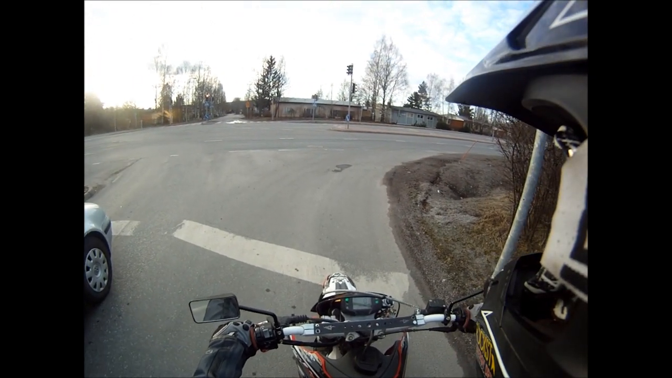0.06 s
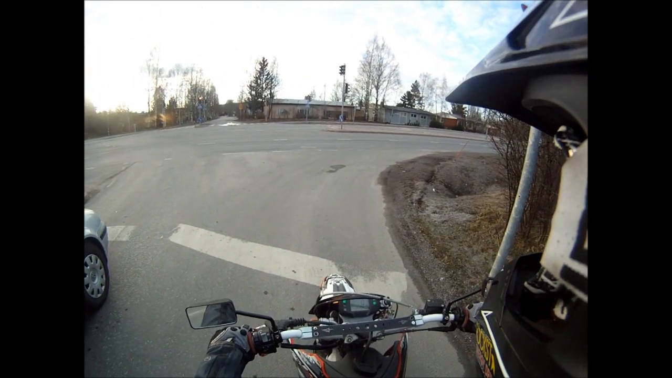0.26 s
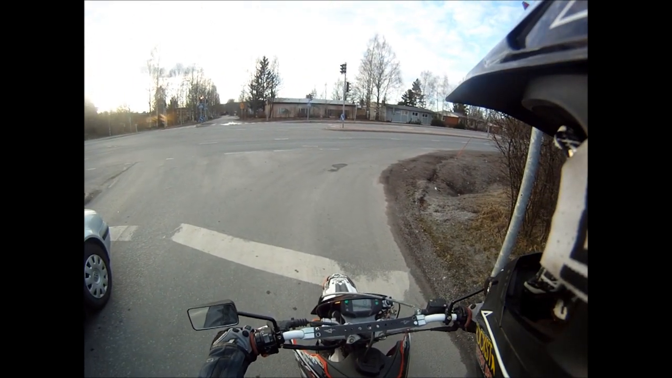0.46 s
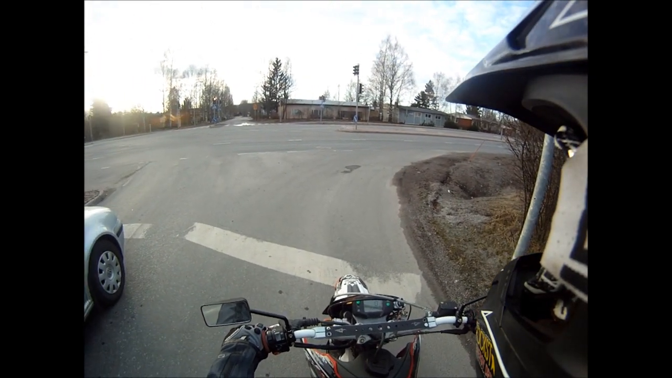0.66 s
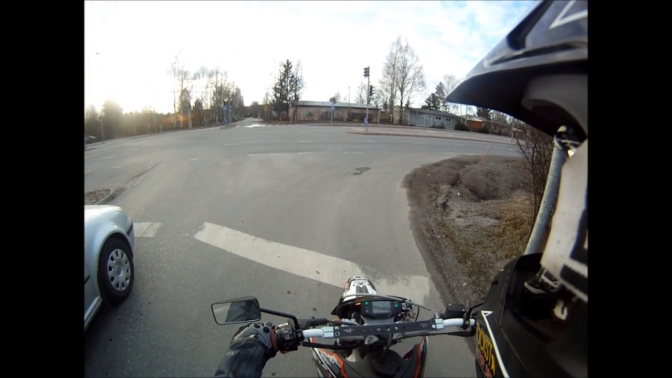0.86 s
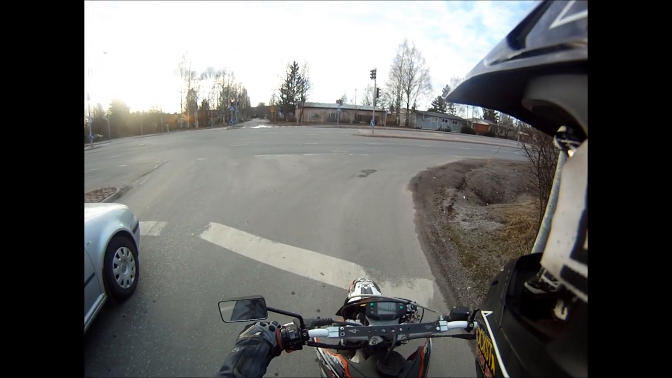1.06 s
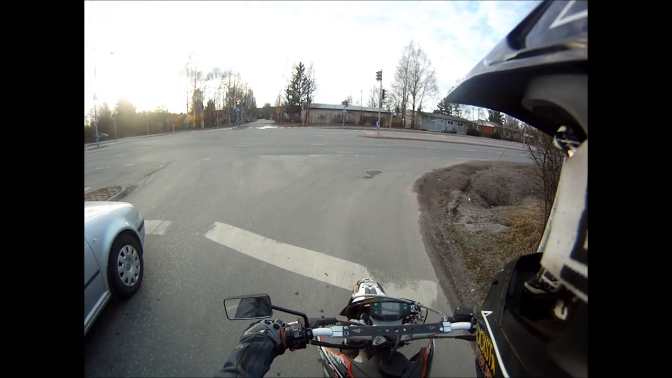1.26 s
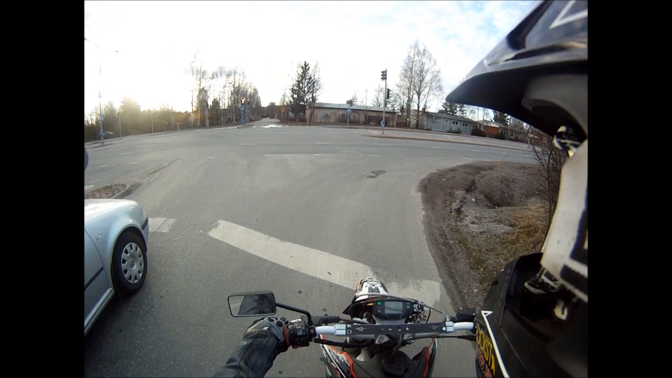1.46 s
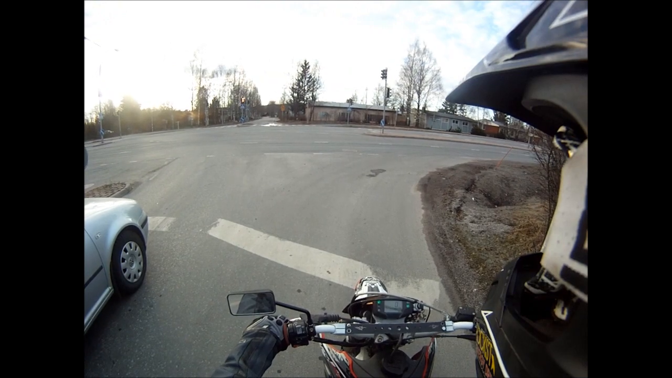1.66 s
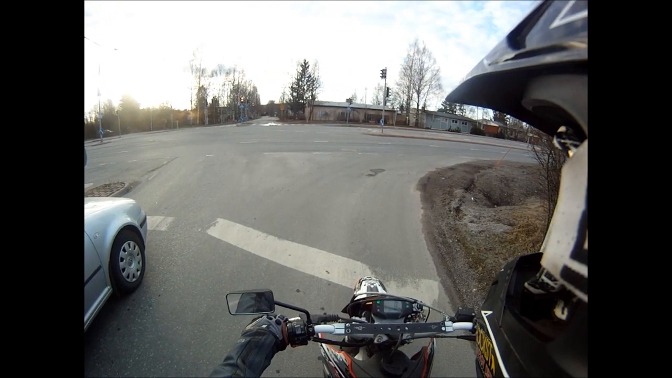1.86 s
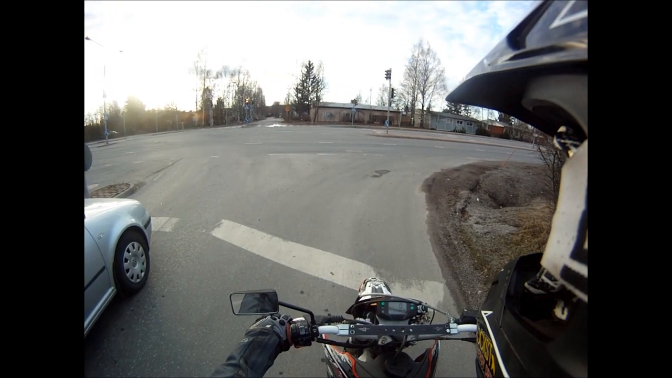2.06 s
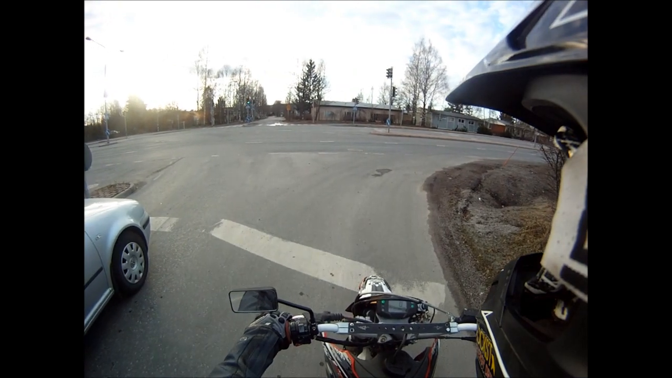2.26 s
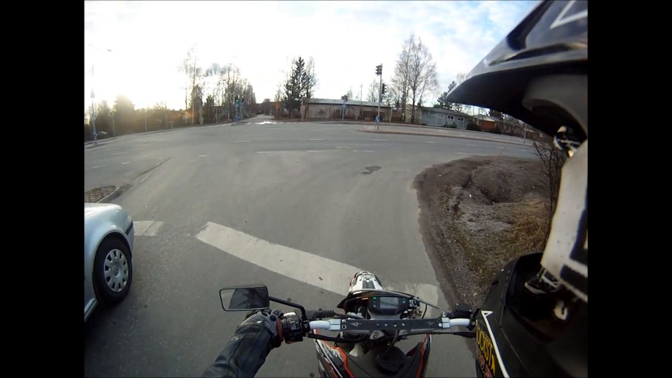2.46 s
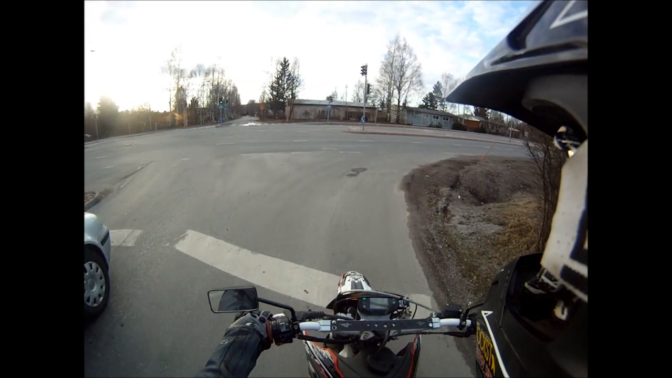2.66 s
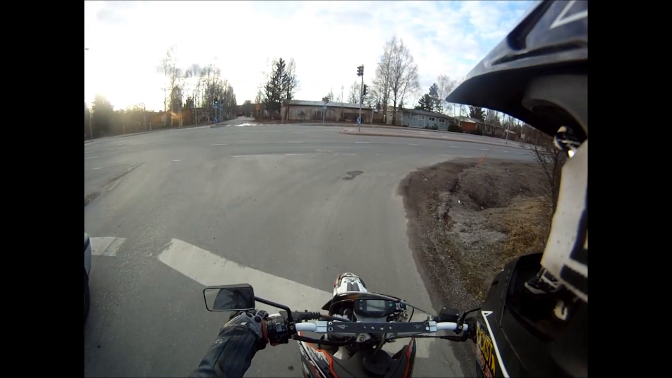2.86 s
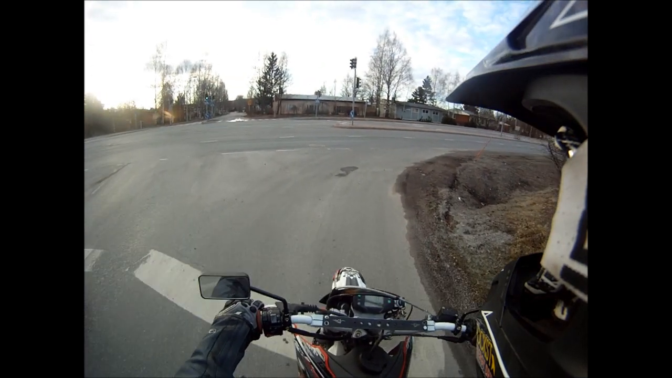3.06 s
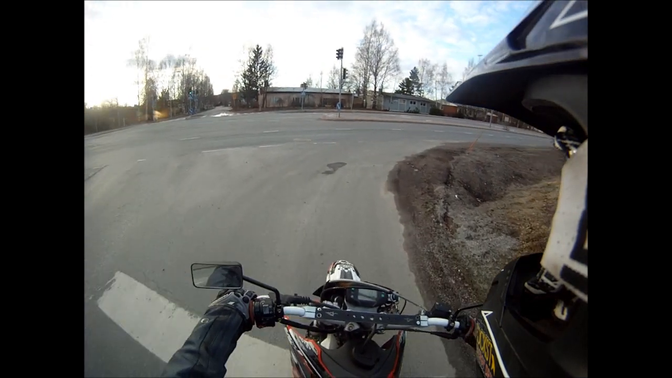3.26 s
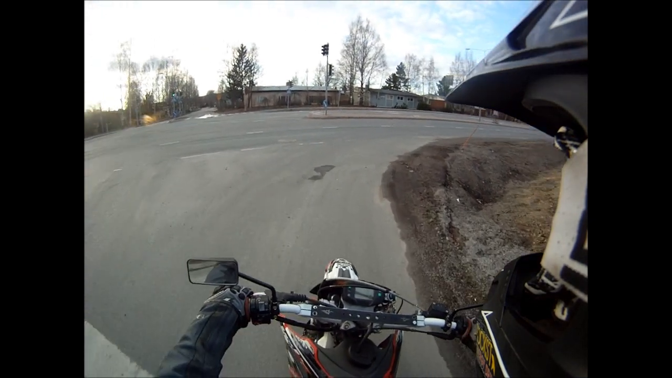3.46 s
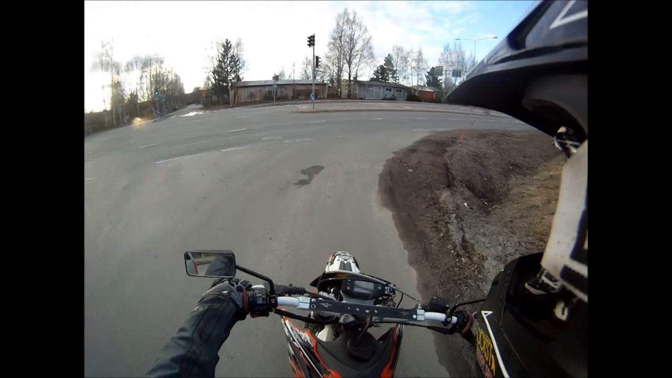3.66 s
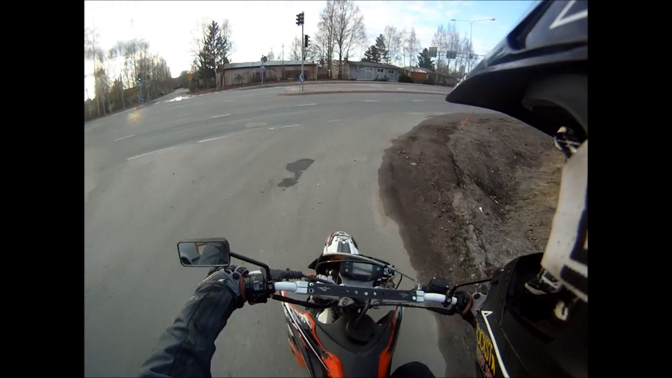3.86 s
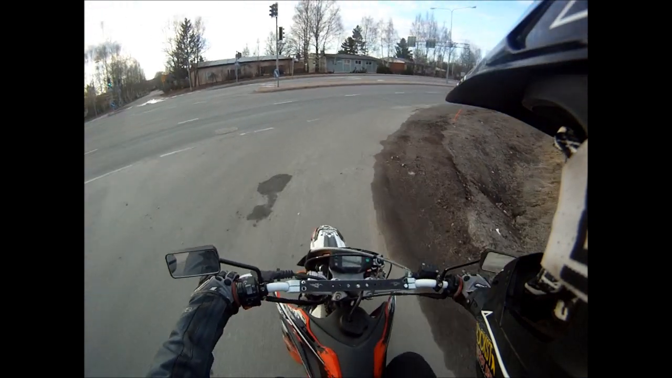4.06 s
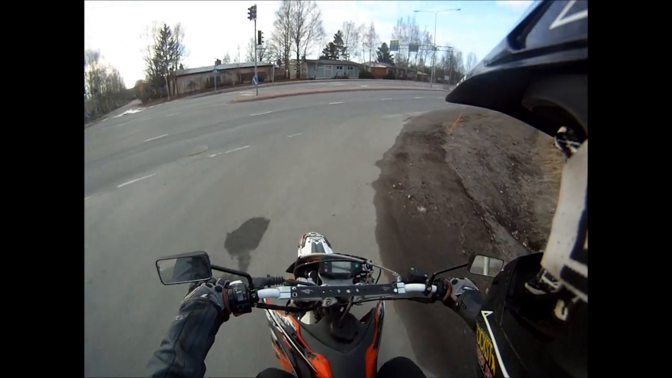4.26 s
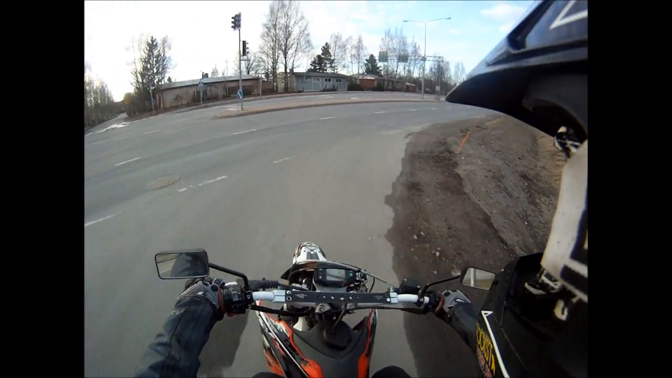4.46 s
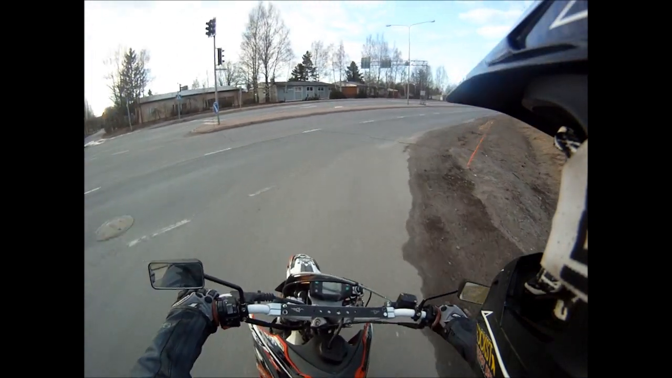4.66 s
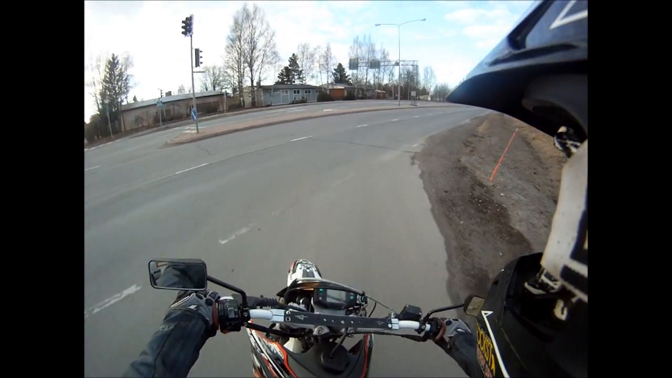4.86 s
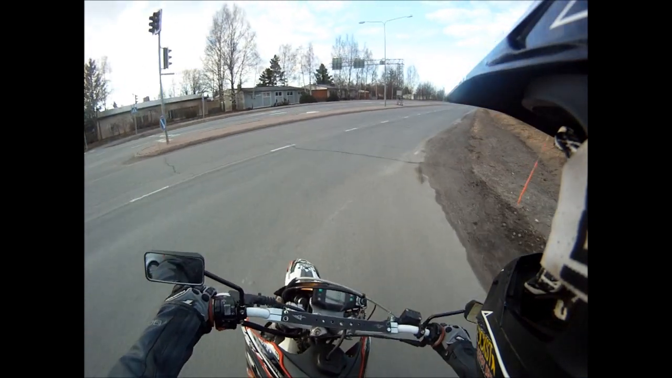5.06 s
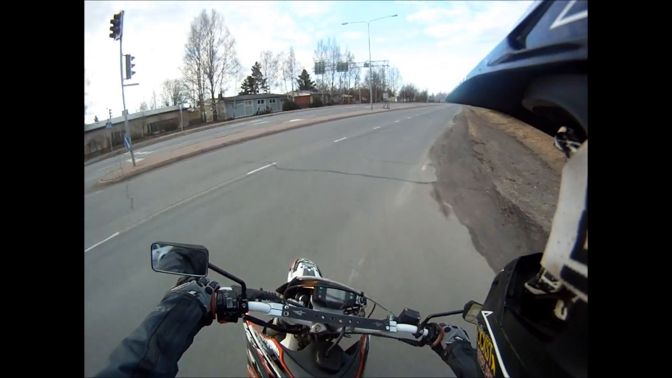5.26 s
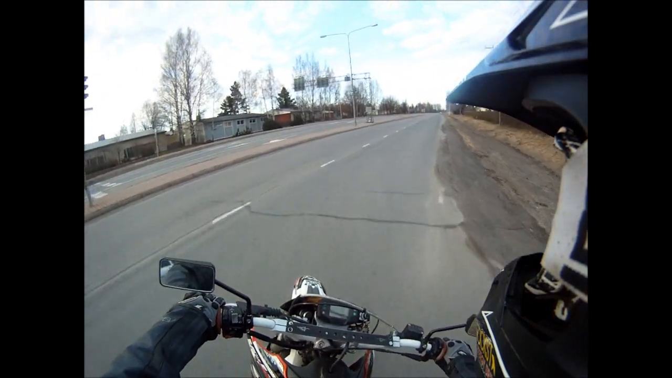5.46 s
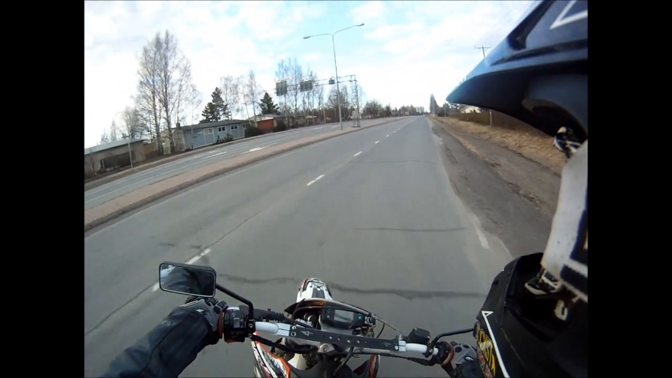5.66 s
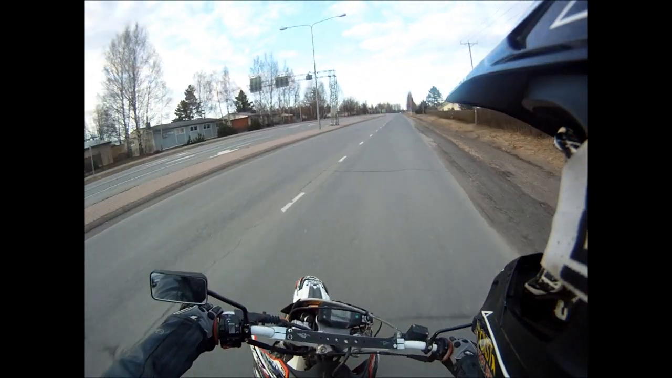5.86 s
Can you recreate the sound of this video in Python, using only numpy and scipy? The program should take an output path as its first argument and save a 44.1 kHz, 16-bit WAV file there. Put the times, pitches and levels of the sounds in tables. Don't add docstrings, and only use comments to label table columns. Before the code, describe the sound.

Close, gritty two-stroke dirt bike idles with uneven thumps and metal rattle, bites, pulls away, stutters briefly, then revs steadily higher.

```python
import sys
import numpy as np
from scipy import signal
from scipy.fft import rfft, irfft, next_fast_len
from scipy.io import wavfile
from scipy.ndimage import uniform_filter1d, map_coordinates

SR = 44100
rng = np.random.default_rng(int(sys.argv[2]) if len(sys.argv) > 2 else 0)


def volts_from_db(level):
    exponent = np.asarray(level, float) / 20
    return 10 ** exponent


def persist_wave(psi):
    counts = np.round(np.clip(psi, -1, 1) * 32767).astype(np.int16)
    wavfile.write(sys.argv[1], SR, np.atleast_2d(counts).T)


N = 261072
T = np.arange(N) / SR


def unit(x):
    return x / np.sqrt(np.mean(x ** 2) + 1e-20)


def steady(x, span):
    size = int(span * SR)
    power = uniform_filter1d(uniform_filter1d(x * x, size), size)
    return x / np.sqrt(np.abs(power) + 1e-12)


def curves(rows):
    s, *columns = np.transpose(rows)
    return [np.interp(T, s, column) for column in columns]


def wobble(rate):
    knots = rng.standard_normal(int(N * rate / SR) + 4)
    return map_coordinates(knots, [T * rate])


def passing(centre_s, width_s):
    return np.exp(-((T - centre_s) / width_s) ** 4)


def filtered(x, response):
    m = 2 * next_fast_len(N // 2 + SR // 4)
    return irfft(rfft(x, m) * response(np.fft.rfftfreq(m, 1 / SR)), m)[:N]


def modes(table):
    def response(f):
        total = 0
        for k, (centre, width, db) in enumerate(table):
            damping = 1j * f * width
            total = total + (-1) ** k * volts_from_db(db) * damping / (centre * centre - f * f + damping)
        return total
    return response


def spectrum_gain(spectrum, hz):
    f, db = np.transpose(spectrum)
    return volts_from_db(np.interp(np.log(hz + 1), np.log(f), db))


def coloured(spectrum, x):
    return unit(filtered(x, lambda hz: spectrum_gain(spectrum, hz)))


def causal(spectrum):
    def response(hz):
        cepstrum = irfft(np.log(spectrum_gain(spectrum, hz)))
        cepstrum[1:len(hz) - 1] *= 2
        cepstrum[len(hz):] = 0
        return np.exp(rfft(cepstrum))
    return response


# frequency in Hz, level in dB per Hz.
RUMBLE = [(12, -11), (25, -28), (50, 3), (100, -6), (200, -19.5), (400, -0.5), (800, -14.5), (2000, -59)]


def road():
    left_s, fade_db_per_s = 2.56, 25
    near = volts_from_db(-fade_db_per_s * np.clip(T - left_s, 0, None))
    idle_hz, hum_db, rumble_db = 28, -40, -38
    hum = np.sqrt(2) * near * volts_from_db(hum_db + 0.46 * wobble(3.9)) * np.sin(2 * np.pi * idle_hz * T)
    gust_s, gust_wide_s, gust_db = 4.87, 0.78, -34
    gust = volts_from_db(gust_db) * np.exp(-((T - gust_s) / gust_wide_s) ** 2)
    flutter = volts_from_db(4.6 * wobble(9.1))
    return hum + (volts_from_db(rumble_db) * near + gust) * flutter * coloured(RUMBLE, rng.standard_normal(N))


# start in seconds, peak in dB.
PINGS = [(1.7944, -20), (1.946, -17), (2.0423, -18.5), (2.1053, -15), (2.164, -14), (2.2243, -15),
         (2.2844, -19), (2.35, -24), (2.4095, -27), (2.475, -88), (2.5351, -38)]


def add_pings(metal):
    t = np.arange(600) / SR
    for s, db in PINGS:
        decay = volts_from_db(db + 29 - 60 * t / 0.015)
        metal[round(s * SR):][:len(t)] += decay * rng.standard_normal(len(t))


# frequency in Hz, level in dB per Hz.
RATTLE = [(380, -1.5), (650, -1), (747, -14), (858, -9), (950, -19), (1070, -6), (1220, -10), (1340, -3.5),
          (1780, -11.5), (2190, -4), (2810, -5), (3510, -19.5), (4110, -19.5), (4760, -18), (5950, -30),
          (7740, -77), (13100, -120)]
# centre in Hz, width in Hz, level in dB.
FINS_SLIP = [(1920, 100, -14.5), (2220, 19, 6), (2348, 34, -0.5), (2890, 44, 13), (3385, 42, 0.5),
             (3726, 77, 12.5), (4470, 64, 5), (4660, 82, 10)]
# centre in Hz, width in Hz, level in dB.
FINS_MOVING = [(1550, 13, 1.2), (2050, 42, 4.7), (2527, 18, 1.3), (2673, 22, 8.8), (3066, 12, 2),
               (3920, 19, 6.3), (4660, 24, 7.5), (5160, 52, 10)]


def rattle(size, phase, pulses, locked, slipping, throttle, pull_db):
    jolt = uniform_filter1d(size, size=600) * (1 + .4 * np.exp(-2.5 * phase))
    shake = steady(.3 + jolt, .2)
    loose = shake * volts_from_db(0.97 * wobble(8.3) + 0.77 * wobble(24.92)) * rng.standard_normal(N)
    knocks = filtered(pulses, lambda hz: 1 / (1 + (hz / 9000) ** 4))
    metal = np.sqrt(locked) * knocks + np.sqrt(1 - locked) * loose
    add_pings(metal)
    ring_slip = filtered(metal, modes(FINS_SLIP))
    ring_moving = filtered(metal, modes(FINS_MOVING))
    metal += slipping * ring_slip + (1 - slipping) * ring_moving
    idle_db, load_db, pull_share = -33.5, 2.5, 0.11
    level = volts_from_db(idle_db + (load_db + pull_share * pull_db) * throttle)
    return level * steady(coloured(RATTLE, metal), 0.55)


# level in dB, phase in turns.
WHINE = [(-29, 0.28), (-27.5, 0.29)]


def whine(angle):
    orders = [2, 8]
    tones = sum(volts_from_db(db) * np.sin(2 * np.pi * (order * angle + lag))
                for order, (db, lag) in zip(orders, WHINE))
    return passing(2.72, .17) * tones


def climb_howl(size, angle, climb):
    order, level_db, lag_turns = 5, -19, 0.28
    tone = np.sin(2 * np.pi * (order * angle + lag_turns))
    return uniform_filter1d(size, size=300) * climb * volts_from_db(level_db) * tone


# centre in Hz, width in Hz, level in dB.
RASP = [(1040, 15, 6.5), (1237.5, 39, 16.5), (1447, 130, -17), (1726, 56, 7.5), (2310, 210, -18),
        (2616, 630, -7)]
# centre in Hz, width in Hz, level in dB.
RASP_HOT = [(1110, 110, 8), (1330, 94, 12.5), (1730, 260, -9.5), (2420, 360, -5), (2730, 110, 2)]


def rasp(ring, hot, throttle, level_db, pull_db):
    idle_db, under_exhaust_db = -51, -25.5
    rasp_db = idle_db + throttle * (level_db + pull_db + under_exhaust_db - idle_db)
    cool_ring = unit(ring(modes(RASP), 2.5))
    hot_ring = unit(ring(modes(RASP_HOT), 3))
    return volts_from_db(rasp_db) * ((1 - hot) * cool_ring + hot * hot_ring)


# frequency in Hz, level in dB.
BARK_SLIP = [(220, -46.5), (375, 2.5), (455, 3), (510, -10), (546, 4.5), (580, -4), (620, -13), (661, -22),
             (701, -32), (840, -20.5), (960, -26), (1250, -56), (2110, -120)]
# frequency in Hz, level in dB.
BARK_WARM = [(220, -18.5), (370, -3), (405, 10.5), (430, 5), (480, 6), (515, -7), (545, 2), (585, -7),
             (625, 0.5), (665, -4.5), (740, -20.5), (850, -26), (960, -38), (6000, -140)]
# frequency in Hz, level in dB.
BARK_HOT = [(220, -55.5), (335, -42), (385, -16), (448, 2.5), (502, 1.5), (573, -6), (640, -1.5),
            (706, -26), (741, -20), (817, -40), (891, -23), (960, -46), (1250, -24), (2110, -120)]
BARK_DB = [-11.5, -13, -7.5]


def bark(ring, stages, level_db, bite_db):
    total = 0
    for stage, colour, db in zip(stages, [BARK_SLIP, BARK_WARM, BARK_HOT], BARK_DB):
        total = total + stage * volts_from_db(level_db + bite_db + db) * unit(ring(causal(colour), 1.7))
    return total


# frequency in Hz, level in dB.
BOOM_SLIP = [(20, -72), (40, -34), (65, -31.5), (130, -30.5), (195, -28.5), (228, -10), (258, -10),
             (295, -15), (330, -21), (390, -26), (6000, -120)]
# frequency in Hz, level in dB.
BOOM_WARM = [(20, -82), (40, -39.5), (85, -30), (125, -33), (158, -32.5), (175, -28), (210, -21),
             (238, -17), (258, -12.5), (285, -12), (325, -14), (380, -37.5), (500, -65.5), (6000, -100)]
# frequency in Hz, level in dB.
BOOM_HOT = [(20, -63), (60, -40), (100, -26.5), (120, -24.5), (145, -35.5), (175, -24.5), (200, -17),
            (225, -11), (270, -8), (296, -13.5), (315, -19), (345, -20), (385, -33.5), (6000, -140)]
# centre in Hz, width in Hz, level in dB.
THUD = [(270, 120, 0)]


def boom(ring, bangs, stages, climb, level_db):
    body = sum(stage * unit(ring(causal(colour), 0.29))
               for stage, colour in zip(stages, [BOOM_SLIP, BOOM_WARM, BOOM_HOT]))
    thud = unit(filtered(bangs, lambda hz: modes(THUD)(hz) ** 2))
    body += .75 * climb * (thud - body)
    return volts_from_db(level_db) * steady(body, .2)


# start in seconds, extra size.
LUMPS = [(.017, 0.36), (0.105, 0.4), (0.205, 0.43), (0.261, 0.55), (.343, 0.37), (.444, 0.41), (.52, 0.37),
         (.584, 0.17), (0.653, 0.43), (0.719, 0.42), (0.807, 0.28), (0.906, 0.36), (0.979, 0.42),
         (1.045, 0.3), (1.122, 0.18), (1.239, 0.21), (1.326, 0.27), (1.408, 0.27), (1.491, 0.22),
         (1.543, 0.35), (1.624, 0.66), (1.686, 0.74)]


def lumps(early_s):
    thump_s = .017
    base = .36 + .64 * (T > LUMPS[-1][0])
    return base + sum(extra * 1.3 * np.exp(-((T - s + early_s) / thump_s) ** 2) for s, extra in LUMPS)


# frequency in Hz, level in dB.
TICKOVER = [(20, -71), (120, -55.5), (200, -42.5), (240, -35.5), (280, -41.5), (320, -34.5), (410, -38.5),
            (500, -43), (650, -60), (900, -62), (6000, -100)]


def tickover(ring):
    return volts_from_db(-25.5) * steady(ring(causal(TICKOVER), 1.0) * lumps(0) ** .45, 0.11)


# start in seconds, end in seconds, one weak turn in so many, share lost by that turn,
# share gained by the next.
SKIPS = [
    (1.744, 2.097, 2, .62, .45),
    (2.112, 2.535, 2, .45, .2),
    (4.474, 4.5, 3, .8, .3),
    (4.627, 4.866, 3, .9, .3),
    (4.907, 4.93, 3, .9, .3),
    (5.873, 5.889, 3, .6, .4),
]


def charge(turn):
    size = lumps(.014)
    for start, end, every, loss, gain in SKIPS:
        first = turn[round(start * SR)] + 1
        place = (turn - first) % every
        change = gain * (place == 1) - loss * (place == 0)
        size *= 1 + change * (T >= start) * (T < end)
    return size * volts_from_db(0.15 * rng.standard_normal(N // 50)[turn.astype(int)])


# delay in seconds, share.
CHAMBER = [(.0031, .45), (.0067, .45), (.0131, .35)]


def chamber(hz):
    response = 1
    for s, share in CHAMBER:
        delay = np.exp(-2j * np.pi * hz * s)
        response = response * (delay - share) / (1 - share * delay)
    return response


# time in seconds, turns per second.
SPEED = [(1.6, 40.5), (1.7, 42.3), (1.78, 46.0), (1.95, 59.1), (2.1, 65.9), (2.35, 63.7), (2.53, 64.8),
         (2.87, 76.8), (3.08, 80.8), (3.3, 81.1), (3.75, 84.9), (4.15, 86.0), (4.47, 90.3), (4.94, 101.2),
         (5.22, 115.0), (5.38, 121.3), (5.74, 142.0), (5.92, 146.5)]
ROUGH = [(42, .2, .1), (45, .03, .1), (64, .015, .3), (72, .012, .35), (100, .01, .45), (110, .006, .75)]


def crank(throttle):
    hunt = 1 + .02 * (1 - throttle) * wobble(6)
    speed = uniform_filter1d(curves(SPEED)[0], size=3000) * hunt
    knots, *columns = np.transpose(ROUGH)
    rough, locked = [np.interp(speed, knots, column) for column in columns]
    angle = np.cumsum(speed * (1 + .03 * rough * wobble(20))) / SR + .7
    return angle, rough, locked


# time in seconds, exhaust level in dB, bite in dB that lifts the bark,
# pull in dB that lifts rasp and rattle.
EFFORT = [(1.6, -15.5, -2, -8), (1.76, -19.5, 5, 2), (2.1, -15, 2.5, 3), (2.55, -14.5, 4.5, -3),
          (2.9, -13.5, -0.5, 4), (3.5, -14, 2.5, 6.5), (4.15, -12, 5, 5.5), (4.4, -13.5, 4, 7.5),
          (4.65, -13, 3, 0), (4.8, -14.5, 4.5, 3.5), (4.97, -15.5, 7, 5.5), (5.17, -15, 2.5, 13.5),
          (5.3, -14, -2, 6.5), (5.5, -13, -5, 9.5), (5.72, -12, -5, -1.5), (5.92, -12, -5, -19)]
# time in seconds, heat (0 clutch slipping, 1 warm, 2 hot).
HEAT = [
    (2.53, 0.06),
    (2.56, 1.17),
    (4.3, 1.31),
    (4.6, 1.63),
    (5.05, 1.94),
]


def engine():
    open_s, open_takes_s = 1.6, .11
    throttle = np.clip((T - open_s) / open_takes_s, 0, 1)
    angle, rough, locked = crank(throttle)
    turn = np.floor(angle)
    phase = angle - turn
    size = charge(turn)
    level_db, bite_db, pull_db = curves(EFFORT)

    bangs = steady(size * np.diff(turn, prepend=0), .2)
    pulses = filtered(bangs, chamber)
    gas = steady(size * np.exp(-2 * phase) * rng.standard_normal(N), .2)

    def ring(response, roughness):
        share = np.clip(roughness * rough, 0, .9)
        return filtered(np.sqrt(1 - share) * pulses + np.sqrt(share) * gas, response)

    heat, = curves(HEAT)
    stages = [np.clip(1 - np.abs(heat - k), 0, 1) for k in range(3)]
    climb = passing(1.9, .2)
    load = boom(ring, bangs, stages, climb, level_db) + bark(ring, stages, level_db, bite_db)
    load += climb_howl(size, angle, climb) + whine(angle)
    exhaust = throttle * load + (1 - throttle) * tickover(ring)
    exhaust += rasp(ring, stages[2], throttle, level_db, pull_db)
    return exhaust + rattle(size, phase, pulses, locked, stages[0], throttle, pull_db)


def scene():
    return (road() + engine())[None]


def band_limit(x):
    return signal.sosfilt(signal.butter(12, 15720, fs=SR, output="sos"), x)


def record(dry):
    soft = dry / (1 + np.abs(dry / .75) ** 4) ** .25
    low_hz = 24
    soft = filtered(soft[0], lambda hz: 1j * hz / (low_hz + 1j * hz))[None]
    sampled = signal.resample_poly(soft, 40, 147, axis=1)
    held = np.repeat(sampled, 4, axis=1)
    mix = signal.resample_poly(held, 147, 160, axis=1)[:, :N]
    return band_limit(mix)


dry = scene()
out = record(dry)
persist_wave(out)
```